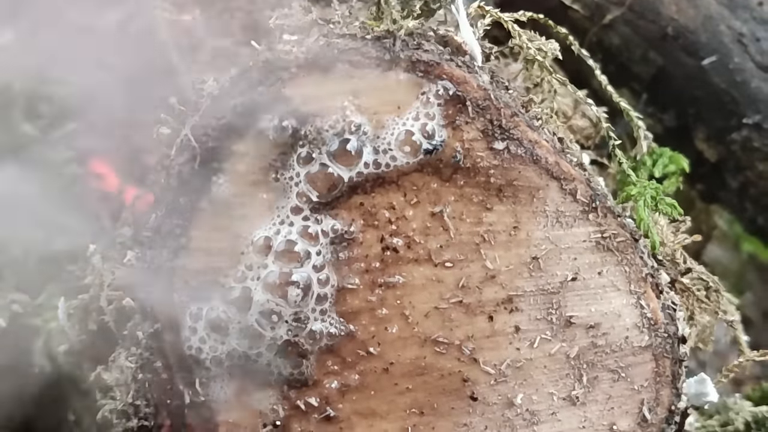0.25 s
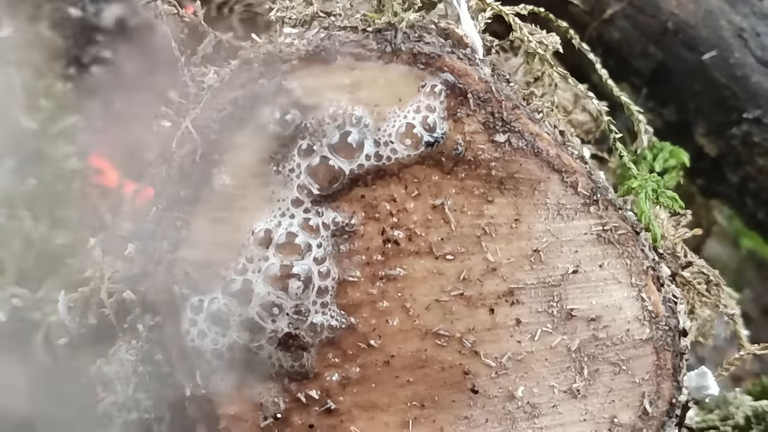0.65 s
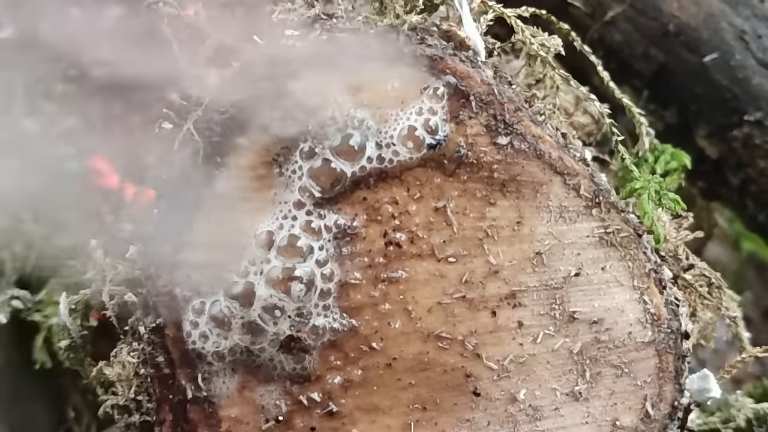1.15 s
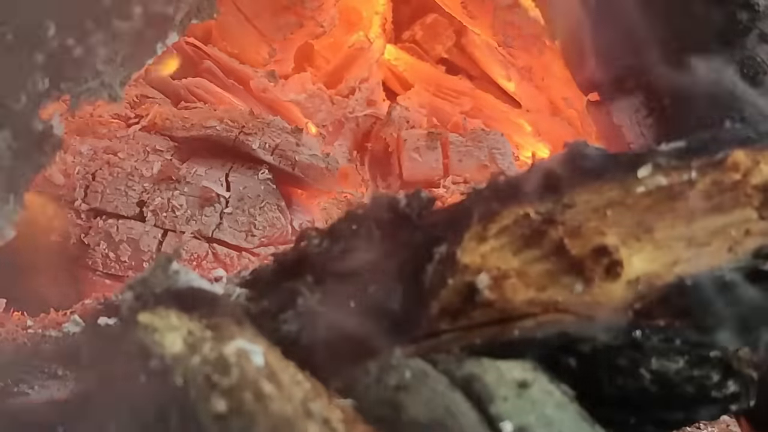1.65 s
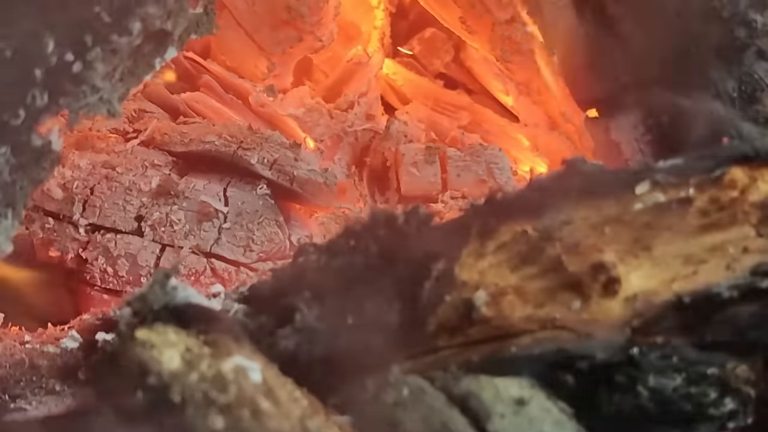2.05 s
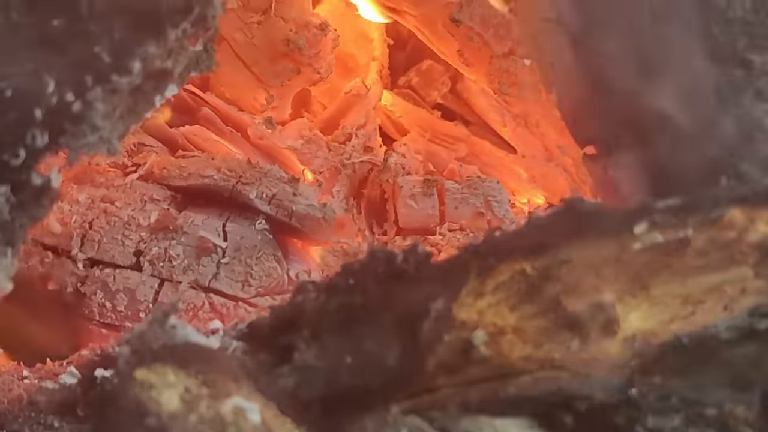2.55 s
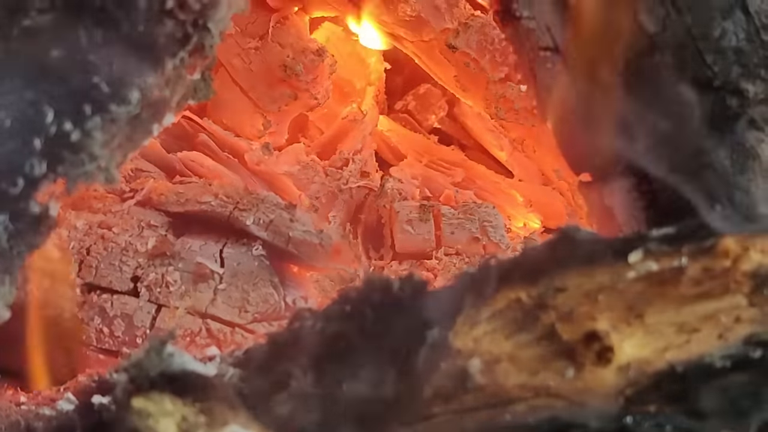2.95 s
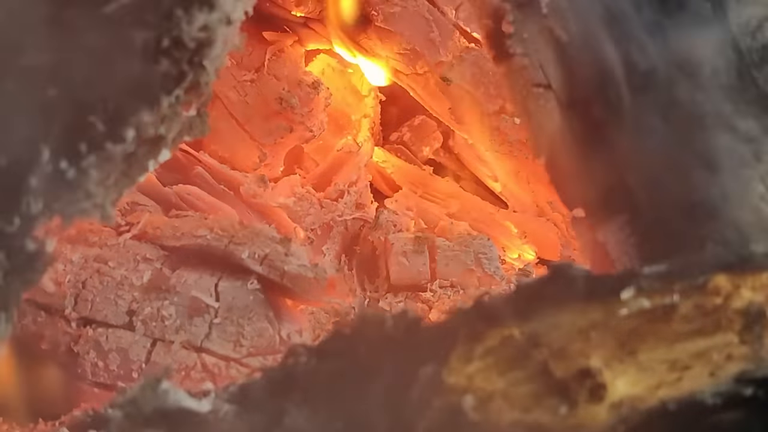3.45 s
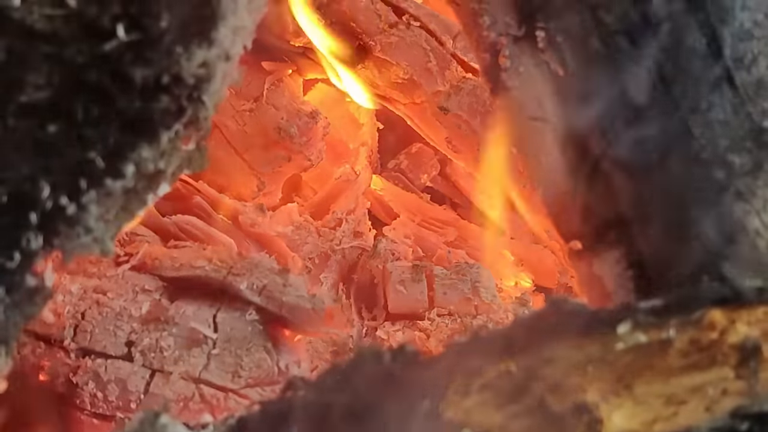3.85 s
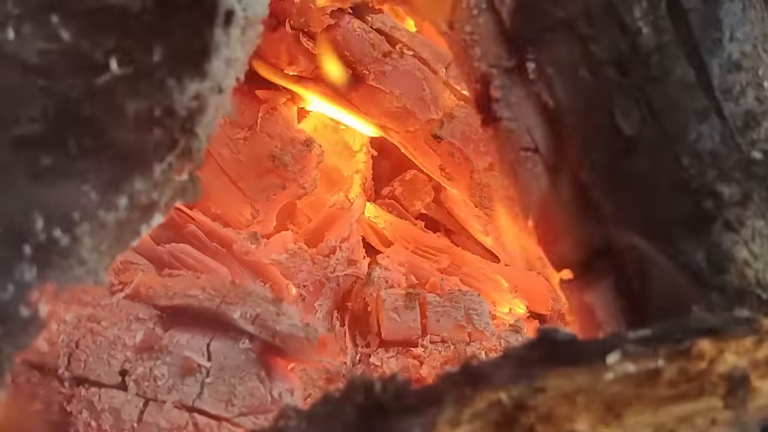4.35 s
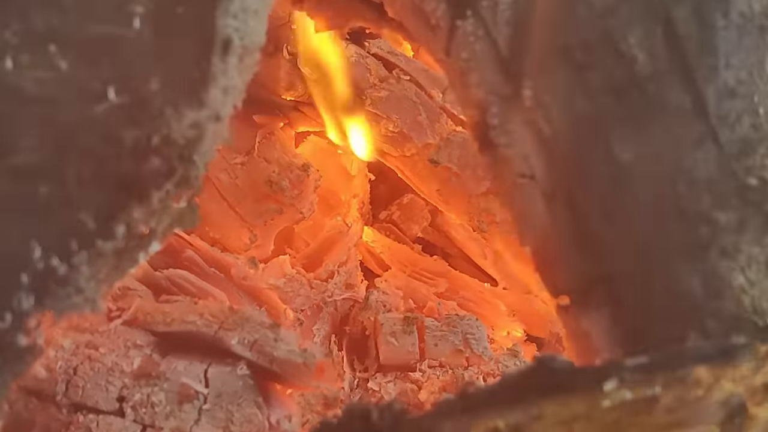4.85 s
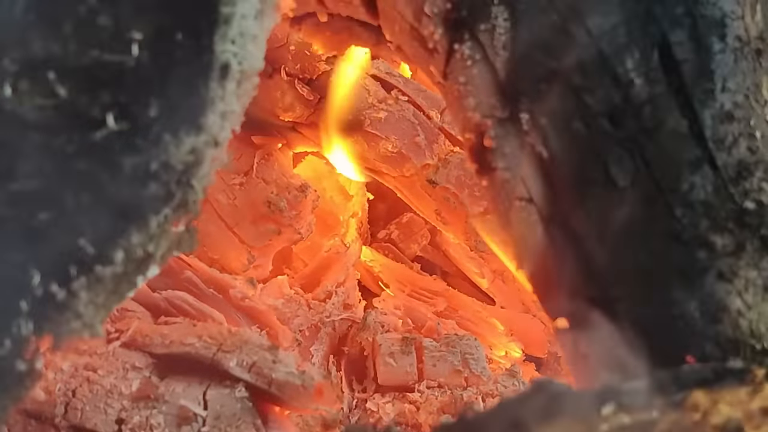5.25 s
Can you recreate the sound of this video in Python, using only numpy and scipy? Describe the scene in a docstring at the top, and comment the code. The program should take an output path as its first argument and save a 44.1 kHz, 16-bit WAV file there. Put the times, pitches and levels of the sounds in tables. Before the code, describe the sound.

Outdoor fire, close stereo microphone. Steam sputters in a high, patchy hiss from a foaming log end, over soft low flame rumble and scattered dull pops. At about 1.4 seconds a tiny near-silent gap marks a cut; beside glowing embers the hiss becomes a whistly jet, stronger on the right, gently swelling and sagging, with pops and a few bright snaps on the left.

```python
"""Sap boils out of a burning log at an outdoor fire: steam hisses through the pores of the wood.
First the foaming cut end is heard from the front, as patchy noise coloured by pore resonances.
After a brief break the place is beside the embers: the jet, stronger to the right, swells and sags.
Throughout, flames rumble softly as slowly fluttering low noise and gas pockets pop as damped swings.
From the embers on, the char snaps now and then: short bright noise with a woody knock and rattle."""
import sys
import numpy as np
from scipy import signal
from scipy.fft import rfft, irfft
from scipy.io import wavfile
from scipy.ndimage import uniform_filter1d

SR = 44100
rng = np.random.default_rng(int(sys.argv[2]) if len(sys.argv) > 2 else 0)


def to_wav(sig):
    """Store sig (one row per channel, or 1-D mono) as 16-bit WAV at the path in sys.argv[1].

    Samples outside -1..1 are clipped; the rate is SR.
    """
    pcm = np.clip(np.atleast_2d(sig), -1, 1) * 32767
    pcm = np.round(pcm).astype(np.int16)
    wavfile.write(sys.argv[1], SR, pcm.T)  # frames by channels


N = 242550
TIME_S = np.arange(N) / SR
FREQS_HZ = np.fft.rfftfreq(N, 1 / SR)


def amp(db):
    """Decibels to gain."""
    return 10 ** (np.asarray(db) / 20)


def unit(x):
    """Scales to rms 1."""
    return x / np.sqrt(np.mean(x ** 2) + 1e-20)


def peaked(x):
    """Scales each channel to peak 1."""
    return x / abs(x).max(axis=-1, keepdims=True)


def over_time(points):
    """A time table joined by straight lines."""
    return np.interp(TIME_S, *np.transpose(points))


def over_freqs(points):
    """A spectrum table joined by straight lines on a log-frequency axis."""
    hz, value = np.transpose(points)
    return np.interp(np.log(FREQS_HZ + 1), np.log(hz + 1), value)


def add(mix, start_s, sound):
    """Lays a stereo sound into the mix at start_s."""
    first = max(round(start_s * SR), 0)
    part = mix[:, first:][:, :sound.shape[1]]
    part += sound[:, :part.shape[1]]


def band(x, low_hz, high_hz, order=2):
    """Causal band-pass."""
    edges_hz = [low_hz, min(high_hz, SR / 2 - 1)]
    return signal.sosfilt(signal.butter(order, edges_hz, "band", fs=SR, output="sos"), x)


def bell(hz, width_hz):
    """A smooth bump over FREQS_HZ, 1 at its centre."""
    return np.exp(-((FREQS_HZ - hz) / width_hz) ** 2)


def filtered(x, gain):
    """Applies a gain per frequency without delay."""
    return irfft(rfft(x) * gain, N)


def colour(white, db):
    """Gives white noise of rms 1 a spectrum in dB per Hz."""
    return filtered(white, amp(db)) * np.sqrt(SR / 2)


def wander(rate_hz):
    """A random flutter of rms 1, mostly between a quarter of rate_hz and rate_hz."""
    highpass = FREQS_HZ / (FREQS_HZ + rate_hz / 4)
    lowpass = 1 / (1 + (FREQS_HZ / rate_hz) ** 2)
    return unit(filtered(rng.standard_normal(N), highpass * lowpass))


def turbulence(patch_db, likeness, lag_s):
    """Many small vents flare on their own; the left ear hears the shared part lag_s later."""
    z = signal.stft(rng.standard_normal((2, N)), nperseg=256)[2]
    patches = uniform_filter1d(rng.standard_normal(z.shape), size=8, axis=1)  # over frequency
    patches = unit(uniform_filter1d(patches, size=14, axis=2))  # over time
    flaring = signal.istft(z * amp(patch_db * patches), nperseg=256)[1]
    own, right = unit(flaring[:, :N])
    shared = np.clip(over_freqs(likeness), -1, 1)
    delayed = rfft(right) * np.exp(-2j * np.pi * FREQS_HZ * lag_s)
    left = irfft(shared * delayed + np.sqrt(1 - shared ** 2) * rfft(own), N)
    return left, right


def vent(noise, slope, pores):
    """Turbulence takes the broad colour of the jet and rings the pores; a small jet lacks bass."""
    ring_db = sum(db / (1 + (2 * (FREQS_HZ - hz) / width_hz) ** 2) for hz, width_hz, db in pores)
    bass_db = -10 * np.log10(1 + (160 / (FREQS_HZ + 1)) ** 2)
    return colour(noise, over_freqs(slope) + ring_db + bass_db)


# broad steam colour per ear, before pores: (frequency [Hz], density [dB per Hz])
END_LEFT_SLOPE = [(500, -88.8), (1500, -85.4), (2800, -86.1), (4500, -77.1), (7500, -77.1), (9500, -66.7),
                  (11200, -63.6), (11700, -73.8), (13400, -66.6), (14300, -70.0)]
END_RIGHT_SLOPE = [(500, -88.4), (1500, -85.4), (2800, -87.9), (4500, -79.3), (6000, -81.7), (7000, -75.5),
                   (8500, -59.9), (10400, -72.6), (10900, -81.3), (12400, -77.9), (14300, -86.5)]
# resonances of pores, cracks and gaps between logs: (frequency [Hz], width [Hz], lift [dB])
END_LEFT_RINGS = [(3099, 347, 4.3), (3557, 117, 3.1), (4872, 242, 4.0), (5434, 559, 5.2), (7155, 559, 4.3),
                  (9053, 317, 2.8), (10654, 508, 8.9)]
END_RIGHT_RINGS = [(1984, 278, 7.6), (3093, 419, 6.3), (3565, 164, 5.0), (4155, 248, 5.0), (5207, 222, 6.5),
                   (7440, 372, 6.1), (8156, 248, 6.0), (8804, 438, 4.1)]
# likeness of the ears, clipped to +-1, negative = opposite phase: (frequency [Hz], correlation [1])
END_EAR_LIKENESS = [(500, 0.4), (1100, 0.075), (1600, -0.3), (2400, 0.083), (2600, -1), (3750, -1),
                    (4100, -0.0085), (4380, -1.5), (4750, -0.14), (5200, 0.22), (6600, -0.13),
                    (9200, -0.35), (13000, 0.0085)]


def cut_end():
    """Steam hisses from the foaming end grain: vent noise with a fast level flutter."""
    left, right = turbulence(patch_db=1.55, likeness=END_EAR_LIKENESS, lag_s=0)
    left = vent(left, END_LEFT_SLOPE, END_LEFT_RINGS)
    right = vent(right, END_RIGHT_SLOPE, END_RIGHT_RINGS)
    return np.array([left, right]) * amp(0.23 * wander(rate_hz=70))


# broad steam colour per ear, before pores: (frequency [Hz], density [dB per Hz])
EMBERS_LEFT_SLOPE = [(500, -88.7), (1700, -85.3), (4000, -87.5), (5400, -91.2), (7800, -83.5),
                     (9700, -72.9), (11000, -72.0), (13200, -80.1), (14300, -87.8)]
EMBERS_RIGHT_SLOPE = [(500, -86.1), (1200, -86.8), (2700, -85.2), (4600, -74.9), (5300, -77.1),
                      (6800, -68.7), (8500, -64.0), (10000, -62.0), (12500, -72.6), (14300, -75.6)]
# resonances of pores, cracks and gaps between logs: (frequency [Hz], width [Hz], lift [dB])
EMBERS_LEFT_RINGS = [(3171, 279, 1.9), (3769, 150, 4.0), (4530, 185, 3.4), (5857, 364, 6.2),
                     (6726, 223, 5.9), (7316, 182, 3.7), (10420, 226, 3.2)]
EMBERS_RIGHT_RINGS = [(1631, 280, 3.8), (2402, 247, 7.3), (2928, 349, 6.1), (3587, 480, 7.5),
                      (4120, 249, 3.8), (6217, 279, 3.1), (6771, 100, 1.8), (7408, 410, 5.8),
                      (8398, 1119, 11.5)]
# likeness of the ears, negative = opposite phase: (frequency [Hz], correlation [1])
EMBERS_EAR_LIKENESS = [(500, 0.065), (1000, 0.98), (1350, 0.83), (1750, 0.78), (2200, -0.55), (3000, 0.48),
                       (8000, -0.24), (13000, 0.044)]
# highest treble of the steam at the left ear: (time [s], level [dB])
LEFT_SHEEN = [(1.4, 0), (2.8, 1), (3.05, -5.5), (3.6, -1.5), (5.5, 0)]
# steam pressure, as heard in the whistling core: (time [s], level [dB])
JET_PRESSURE = [(1.41, -1.5), (1.48, 0.2), (1.8, -0.3), (1.86, 1.5), (1.95, -1.8), (2.02, 0.8), (2.25, 0.8),
                (2.48, -0.2), (2.66, -2.5), (2.8, 1), (2.95, 1.5), (3.25, -0.9), (3.48, 1.1), (3.64, 0),
                (3.74, 2.1), (4.1, -1), (5.02, 0.4), (5.5, -0.5)]


def beside_embers():
    """Steam pressure drives the whistling core fully and the fizz around it by a share of its dB."""
    left, right = turbulence(patch_db=0.88, likeness=EMBERS_EAR_LIKENESS, lag_s=11 / SR)
    left = vent(left, EMBERS_LEFT_SLOPE, EMBERS_LEFT_RINGS)
    right = vent(right, EMBERS_RIGHT_SLOPE, EMBERS_RIGHT_RINGS)
    sheen = filtered(left, bell(11700, 930))
    left = left + sheen * (amp(over_time(LEFT_SHEEN)) - 1)
    steam = np.array([left, right])
    pressure_db, fizz_share = over_time(JET_PRESSURE), 0.34
    whistle = filtered(steam, bell(7900, 1000))
    fizz = steam - whistle
    core = whistle * amp(pressure_db + 0.065 * wander(rate_hz=76))
    jet = core + fizz * amp(fizz_share * pressure_db)
    return jet * amp(0.23 * wander(rate_hz=78))


def swing_of_gas(t, hz, slowing):
    """One heavily damped, slowing swing; larger, lower pockets ring for more cycles."""
    turns = np.cumsum(hz * (1 - slowing * (1 - np.exp(-t * hz * 3)))) / SR
    decay_cycles = 0.32 * max(786 / hz, 1) ** 1.8  # grows as pitch falls below 786 Hz
    return np.sin(2 * np.pi * turns) * np.exp(-turns / decay_cycles)


def splintering(t, high_hz, fibres_per_s=4000, decay_s=0.003, first_fibre=2.7):
    """Fibres break at random instants, ever weaker."""
    fibres = rng.standard_normal(len(t)) * (rng.random(len(t)) < fibres_per_s / SR)
    fibres[0] = first_fibre  # mostly the loudest
    return unit(band(fibres * np.exp(-t / decay_s), 1410, high_hz, order=4))


# ring of the hollow between the logs: (frequency [Hz], width [Hz], level [dB])
HOLLOW_RINGS = [(165, 31, 1.5), (586, 71, -14), (1080, 57, -16)]
# neighbouring logs throw each pop back: (nominal delay [s], gain [1])
LOG_ECHOES = [(.0018, 0.3), (.0044, 0.57)]


def pop(db, hz, splinter_db, slowing=0.11, splinter_hz=2600, muffle_hz=2750,
        scatter_db=-19, scatter_decay_s=0.029):
    """A gas burst swings and splinters the wood, which muffles it; hollow and logs answer."""
    t = np.arange(3072) / SR
    swing = swing_of_gas(t, hz, slowing)
    splinter = amp(splinter_db) * splintering(t, splinter_hz) * swing.std()
    burst = band(swing + splinter, 210, 5600, order=1)
    burst = signal.sosfilt(signal.butter(6, muffle_hz, fs=SR, output="sos"), burst)
    rings = [amp(lift_db) * signal.lfilter(*signal.iirpeak(ring_hz, ring_hz / width_hz, SR), burst)
             for ring_hz, width_hz, lift_db in HOLLOW_RINGS]
    burst = burst + sum(rings)
    scatter = rng.standard_normal((2, len(t))) * np.exp(-t / scatter_decay_s)
    paths = amp(scatter_db) / 2 * scatter / np.sqrt(SR / hz / 4)
    paths[:, 0] = 1  # direct sound
    for delay_s, gain in LOG_ECHOES:
        # each pop, and each ear, by its own path
        arrival_s = delay_s * rng.uniform(0.676, 1.346) * rng.uniform(0.958, 1.005, 2)
        taps = np.clip(np.round(arrival_s * SR).astype(int), 1, len(t) - 1)
        paths[[0, 1], taps] += gain
    return amp(db) * signal.fftconvolve(paths, burst[None], axes=1)


# gas pockets bursting in the wood; splintering is relative to the swing, before muffling:
# (time [s], level [dB], pitch [Hz], splintering [dB])
POCKET_BURSTS = [(0.0511, -26, 630, -8), (0.5337, -26.5, 900, -6), (0.547, -21.5, 1320, -11),
                 (0.641, -30.5, 700, -2), (0.709, -22.5, 690, -9), (1.1886, -23, 796, -7),
                 (1.6418, -35, 840, -8), (1.6550, -28, 750, -1), (1.6765, -27, 700, -7),
                 (1.753, -20, 1400, -2), (1.7987, -26.5, 680, -9), (1.841, -32.5, 650, -7),
                 (2.164, -31.5, 615, -3), (2.8444, -20, 780, -0.5), (2.878, -18, 694, -18),
                 (2.943, -33, 750, 3), (2.9545, -29, 1200, -6), (3.4193, -22, 850, -4),
                 (3.4427, -15.5, 960, -14), (3.4743, -13.5, 875, -9), (3.5109, -30.5, 900, -2),
                 (3.6631, -29, 660, -9), (3.734, -30.5, 1210, 2), (3.9455, -32, 1100, -1),
                 (4.2488, -32, 725, -12), (4.3129, -31, 950, -1), (4.407, -20, 1080, -7),
                 (4.6133, -30, 920, -2), (4.6263, -21.5, 620, -8.5), (4.6535, -26, 1100, -2),
                 (4.8317, -17, 890, -17), (4.8575, -15.5, 544, -13), (5.483, -25.5, 690, -22)]


def gas_pockets(count=2, wait_s=0.0048, after_db=-25, after_hz=1100, spread_db=4, spread_octaves=0.64):
    """Each burst sets off count weaker ones, wait_s apart on average, of random level and pitch."""
    out = np.zeros((2, N))
    for start_s, db, hz, splinter_db in POCKET_BURSTS:
        add(out, start_s, pop(db, hz, splinter_db))
        for after_s in np.cumsum(rng.exponential(wait_s, count)):
            size, pitch = 2 * rng.random(2) - 1
            weaker_db = db + after_db + spread_db * size
            weaker_hz = after_hz * 2 ** (spread_octaves * pitch)
            add(out, start_s + after_s, pop(weaker_db, weaker_hz, splinter_db))
    return out


def snap(db, knock_db, rattle_db, decay_s=0.00049, tail_db=-19, tail_decay_s=0.004,
         knock_decay_s=0.00028, rattle_decay_s=0.022, right_db=-7):
    """Char cracks brightly to the left, a splitting fibre knocks the wood and crumbs rattle."""
    char_hz, wood_hz = (9300, 11700), (2200, 4300)
    t = np.arange(2048) / SR
    fade = np.exp(-t / decay_s) + amp(tail_db) * np.exp(-t / tail_decay_s)  # tail: short reflections
    crack = band(rng.standard_normal((2, len(t))) * fade, *char_hz)
    knock = band(rng.standard_normal(len(t)) * np.exp(-t / knock_decay_s), *wood_hz, order=3)
    grains = rng.standard_normal((2, len(t))) ** 3  # cubed: sparse peaks
    crumbs = band(grains * np.exp(-t / rattle_decay_s), *wood_hz)
    parts = peaked(crack) + amp(knock_db) * peaked(knock) + amp(rattle_db) * peaked(crumbs)
    return amp(db) * parts * amp([[0], [right_db]])


# snaps of the char; level is the crack's peak at the left ear, knock and rattle relative to it:
# (time [s], level [dB], knock [dB], rattle [dB])
CHAR_SNAPS = [(2.3117, -15.5, -26, -32), (2.8779, -11.5, -9, -23), (3.4745, -25, 4, -2),
              (4.8321, -11.5, -6, -15)]


def char():
    """A few sharp snaps as the brittle char cracks."""
    out = np.zeros((2, N))
    for start_s, db, knock_db, rattle_db in CHAR_SNAPS:
        add(out, start_s, snap(db, knock_db, rattle_db))
    return out


# flame rumble: (frequency [Hz], density [dB per Hz])
FLAME_RUMBLE = [(10, -64), (30, -69), (65, -68), (110, -71), (160, -72.5), (215, -84.5), (380, -88),
                (600, -103), (1500, -110)]


def flames():
    """Eddies make a low fluttering rumble, nearly alike at both ears."""
    eddies = rng.standard_normal(N) + amp(-12.5) * rng.standard_normal((2, N))
    return colour(eddies, over_freqs(FLAME_RUMBLE)) * amp(1.0 * wander(rate_hz=3.6))


def scene():
    """The two listening places one after the other, with a near-silent instant between them."""
    break_from_s, break_to_s, break_db = 1.383, 1.3953, -32
    steam = np.where(TIME_S < break_from_s, cut_end(), beside_embers())
    in_break = (TIME_S > break_from_s) & (TIME_S < break_to_s)
    level = uniform_filter1d(np.where(in_break, amp(break_db), 1.), size=24)
    return (steam + gas_pockets() + char() + flames()) * level


def record(dry):
    """Linear-phase low-pass that limits the band."""
    lowpass = signal.firwin(511, 14300, window=("kaiser", 8), fs=SR)  # edge in Hz
    return signal.oaconvolve(dry, lowpass[None], "same")


dry = scene()
out = record(dry)
to_wav(out)
```